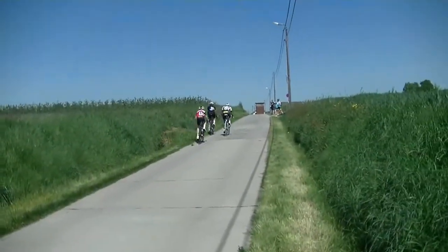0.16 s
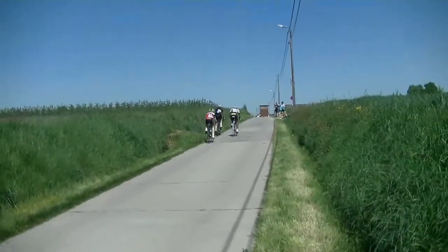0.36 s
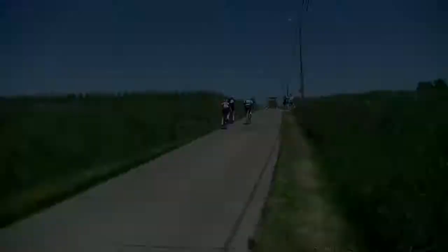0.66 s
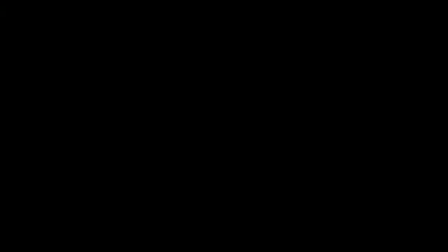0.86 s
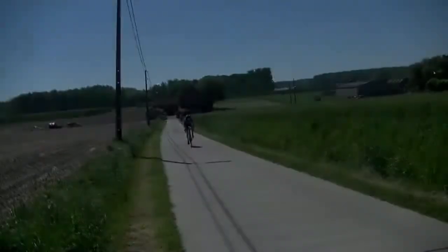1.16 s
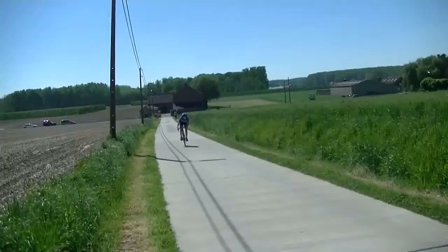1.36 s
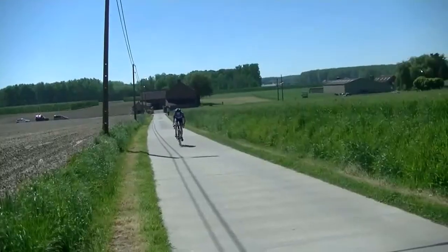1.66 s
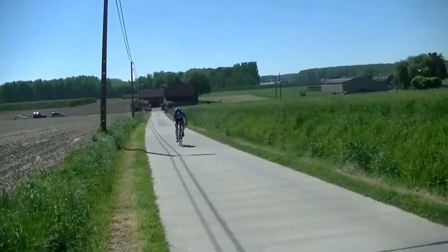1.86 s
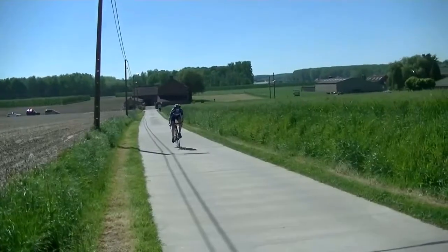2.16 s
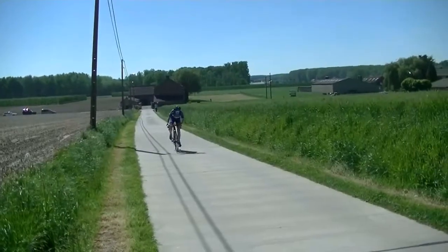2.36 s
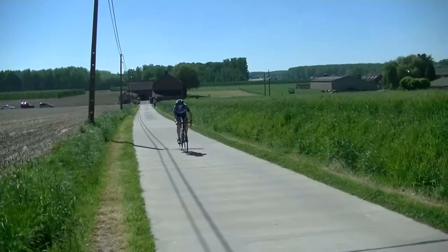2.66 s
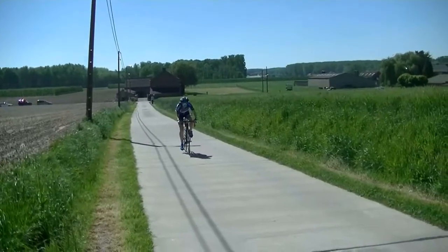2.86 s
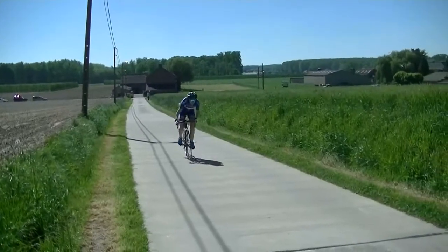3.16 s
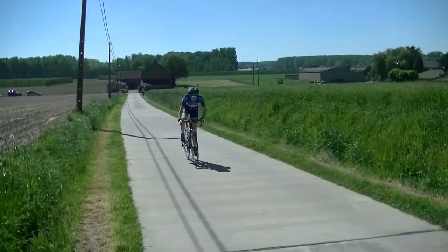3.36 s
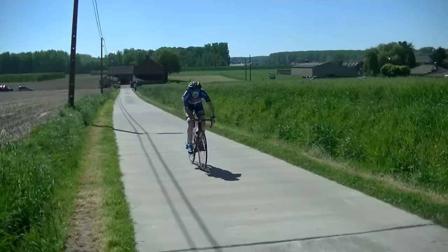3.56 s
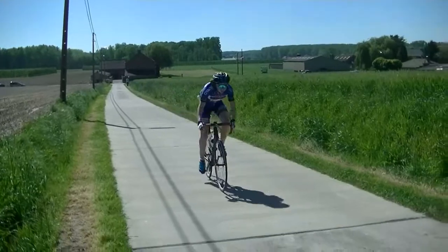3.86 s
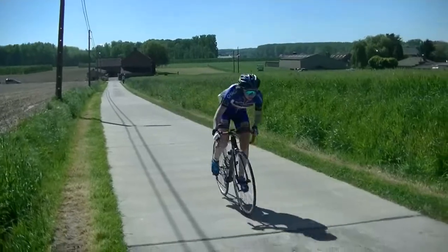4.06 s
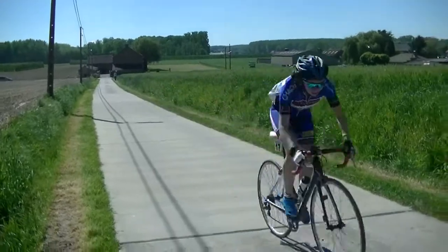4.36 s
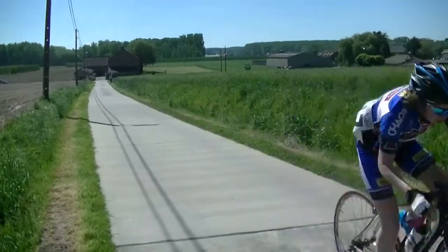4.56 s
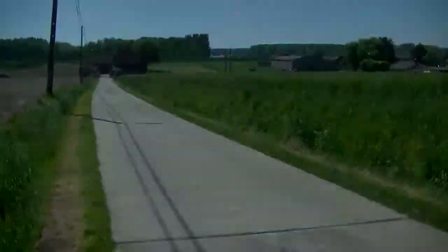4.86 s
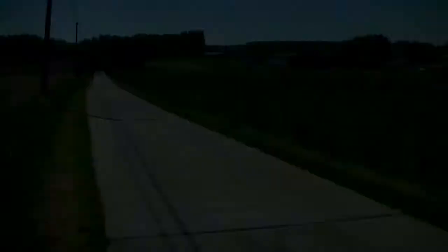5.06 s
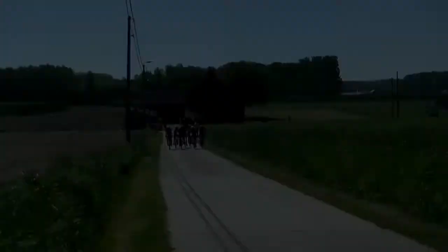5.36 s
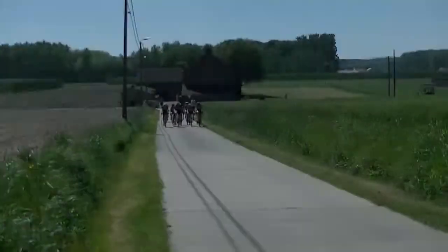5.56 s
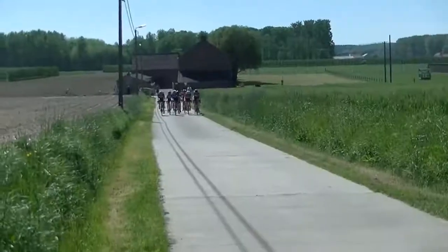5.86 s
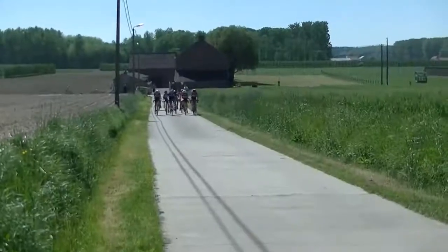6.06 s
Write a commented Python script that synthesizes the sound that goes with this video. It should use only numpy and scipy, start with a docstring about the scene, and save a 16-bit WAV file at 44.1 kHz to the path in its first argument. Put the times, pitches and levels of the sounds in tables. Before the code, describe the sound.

A small handheld stereo microphone stands beside a concrete lane in open fields, with steady faint hiss throughout. From 0 to 0.9 s soft rustling air and low hum sit beneath close handling: dry plastic clicks near 0.2 and 0.5, then the loudest snaps with dull thumps at 0.67 and 0.86, each led by a brief finger rub. A hard cut at 0.93 opens calmer air, with small clicks at 1.3 and 2.7 and a very faint falling whistle at 1.8. A lone bicycle slowly emerges, with pulsing tyre hiss, fine bright chain ticking and faint scuffs. It swells steeply from about 4 s, with sharp ticks from 4.3, and is nearest around 4.95. A heavy short thud at 5.05 and a crisp click at 5.14 follow. At 5.24 it cuts off abruptly, leaving quiet rustle and weak taps until 6.2 s.

```python
"""Case handling and a passing bicycle

Fingers click, rub and thump a plastic case; clicks from 4.3 to 5.2 s are probably ticks of the passing bicycle.
Short rough bursts and pushes ring banks of modes. In the second of three hard-cut shots the bicycle nears
on concrete: noise for tyres and road, ringing chain ticks.
Behind them are field air (patchy noise humming and rustling), one falling sine whistle and microphone hiss.
"""
import sys
import numpy as np
from scipy import signal
from scipy.fft import rfft, irfft, next_fast_len
from scipy.io import wavfile

SR = 44100
rng = np.random.default_rng(int(sys.argv[2]) if len(sys.argv) > 2 else 0)


def digitize_waveform(pressure):
    """Quantize a signal to 16-bit integers and store it at the path in sys.argv[1].

    Rows of a 2-D input are taken as channels; values are limited to [-1, 1].
    """
    field = np.atleast_2d(pressure).T
    bounded = np.clip(field, -1, 1)
    quanta = np.round(bounded * 32767).astype(np.int16)
    wavfile.write(sys.argv[1], SR, quanta)


N = 273413

# Shots: start_s, end_s
SHOTS = [(0, .922), (.928, 5.243), (5.244, 6.2)]

# Sharp clicks: fingers on the plastic case, and from 4.3 to 5.2 s probably ticks of the passing bicycle:
# start_s, peak_db (before pan), centre_hz, contact_s
CLICKS = [(0.176, -29.5, 2690, .002), (0.2029, -19, 2540, 0.0013), (0.2488, -27.5, 2280, 0.0024),
          (0.4853, -12.5, 2600, 0.0011), (0.5374, -12.5, 2560, .0012), (0.607, -34, 2920, 0.0013),
          (0.64, -34, 2230, .0025), (0.653, -33, 2250, 0.0032), (0.662, -21, 4520, 0.0054),
          (0.667, -3, 3960, .002), (0.6812, -24.5, 5440, 0.0022), (0.769, -38.5, 5590, .002),
          (0.8007, -40, 2350, .002), (0.809, -26.5, 2450, .002), (0.815, -37, 2410, 0.0018),
          (0.8205, -42, 2370, .002), (0.836, -23, 2380, .0015), (0.845, -27, 2900, 0.0022),
          (0.855, -1, 3240, 0.0019), (0.8588, -11, 2570, 0.0029), (1.3262, -28.5, 3730, 0.0011),
          (2.6688, -16, 2870, .0008), (3.73, -32, 3500, .003), (4.307, -31, 6000, 0.0022),
          (4.422, -31, 5000, .003), (4.462, -25.5, 4300, .002), (4.733, -20.5, 3500, 0.0022),
          (5.046, -15.5, 2420, 0.0028), (5.1405, -11, 3400, .0008), (5.185, -22.5, 4470, 0.0022),
          (5.328, -36, 2480, 0.0028), (5.3435, -44, 4600, .002), (5.468, -42, 5150, .002),
          (5.5713, -41, 2480, .001), (5.785, -43, 2360, .002), (5.812, -41.5, 2810, .003),
          (5.833, -36, 2080, 0.0029), (5.902, -41.5, 2140, .004), (5.9776, -32.5, 4070, .001)]
# Click and rub modes: mode_hz, relative_db, t60_s
SHELL_MODES = [(880, 26.5, 0.045), (1580, -38, 0.0034), (2050, -42, 0.0048), (2488, 6, 0.022),
               (2885, 16, 0.0053), (3560, 7.5, 0.0052), (3550, -15, 0.066), (4140, 17.5, 0.0038),
               (4720, 16, 0.0066), (5190, 19, 0.0059), (5900, -31, 0.04), (6050, 18, 0.0062),
               (7830, -23, 0.0049), (9000, -41, .003), (10060, -21, 0.0016), (13500, -12, .003)]
# Finger drags ending in a slip: end_s, length_s, final_db (before pan)
RUBS = [(0.675, 0.06, -35.5), (0.846, 0.051, -30), (5.836, 0.041, -48)]
# Case thumps: start_s, peak_db (before pan), push_s
THUMPS = [(0.177, -26, 0.0036), (0.202, -28, 0.0033), (0.216, -42, 0.0037), (0.252, -42, 0.0027),
          (0.267, -42, 0.0043), (0.294, -43, 0.0036), (0.453, -41.5, 0.0029), (0.485, -37.5, 0.0038),
          (0.536, -27.5, 0.0034), (0.613, -37.5, 0.0037), (0.621, -35.5, 0.0058), (0.665, -24.5, 0.0022),
          (0.668, -11.5, 0.0039), (0.727, -45, 0.0039), (0.802, -43, 0.0024), (0.81, -33, 0.0034),
          (0.823, -32, 0.0024), (0.831, -29, 0.0041), (0.844, -26, 0.0043), (0.855, -10, 0.0042),
          (1.326, -44.5, 0.0033), (2.667, -46.5, 0.003), (4.906, -41, 0.0047), (4.918, -37.5, 0.0058),
          (4.949, -35.5, 0.0029), (5.142, -38, 0.0029), (5.295, -40, 0.0061), (5.328, -38, 0.0034),
          (5.509, -39.5, 0.0035), (5.772, -44, 0.0054), (5.833, -33, 0.004), (5.904, -44.5, 0.0026),
          (5.937, -44.5, 0.0078), (5.958, -50, 0.0049), (6.064, -45, 0.0037), (6.075, -45, 0.0046),
          (6.086, -48, 0.004), (6.149, -50.5, 0.0032)]
# Body modes: mode_hz, relative_db, t60_s
BODY_MODES = [(157, -12, 0.049), (247, 11, 0.022), (423, 16, 0.0052), (660, 2, 0.008), (930, -4, 0.01)]
# Wheel over a slab joint jolts the case: start_s, peak_db (before pan), push_s, side_db_per_octave
JOINT = (5.047, -7.5, .0045, -8)
# Shifting grip, one value a shot: small_thumps_per_s
GRIP_PER_S = [64, 1.5, 14]
CONTACT_RISE_LENGTHS = 0.83
CLICK_FALL_DB_PER_OCTAVE, FALL_PER_DB_WEAKER = 9, 0.3   # fall away from the centre, for a 0 dB click
RUB_SWELL_DB, SNAP_DB, THUMP_SIDE_DB_PER_OCTAVE, GRIP_DB = 25, 17, 8, -58.5
NEAR_PAN_DB = 1.3   # left over right: the hand holds the left side

# Tyre roar spectrum: freq_hz, relative_db_per_hz
TYRE_SPECTRUM = [(260, -35), (450, -15.5), (748, -16), (818, -6.5), (1070, -14), (1490, -8), (2700, -3),
                 (3140, -6.5), (4110, 1), (6730, -8.5), (7930, -23), (9200, -22), (10400, -42),
                 (11500, -29), (16000, -46)]
# Road rumble spectrum: freq_hz, relative_db_per_hz
ROAD_SPECTRUM = [(18, -53), (30, -5), (119, -19), (264, 2.5), (414, -5.5), (572, -32), (650, -12),
                 (840, -22), (1430, -120)]
# Rider left-right likeness: freq_hz, likeness_0_to_1
RIDER_LIKENESS = [(60, 0.62), (240, 0.92), (950, 1), (3770, 0.9), (15000, 0.94)]
# Distance laws over soft ground: nearest_db (before pushes and pan), loss_db_per_doubling
TYRE_LAW = (-36.5, 10.95)
RUMBLE_LAW = (-56, 6.4)
CHAIN_LAW = (-43.5, 15.2)
# Chain modes: mode_hz, relative_db, t60_s
CHAIN_MODES = [(6550, 2, .007), (7050, -5, .006), (9000, -4, .006), (9600, -2, .006), (10300, -2, .006),
               (11000, -7, .005), (12900, -12, .002)]
# Chain scuffs on the guide, about one a crank turn: centre_s, level_db (before pan), tilt_db_per_octave
SCUFFS = [(2.28, -66.5, 4), (3.1, -61.5, 0), (3.92, -66, -5)]
# Guide resonances: mode_hz, relative_db, t60_s
GUIDE_MODES = [(1570, 0, .01), (2550, -1, .006), (3950, 1, .005)]
SPEED_M_PER_S, PASS_S, NEAREST_M = 9, 4.955, 3.45
DULLING_DB_PER_OCTAVE_M, NEAR_TILT_DB_PER_OCTAVE = 0.0914, 0.13
CRANK_HZ, CRANK_S, CRANK_DB = 1.172, 5.05, 2.5   # turns per s, moment of a push (two a turn), swing
STRONG_LEG_S, STRONG_LEG_DB = 4.323, 1.5   # one leg pushes harder: moment, swing
LINKS_PER_S, SCUFF_WIDTH_S = 56, 0.13
RIDER_PAN_DB = -0.4   # left over right

# Field air, one table a shot: time_s, hum_db, rustle_db
FIELD_LEVELS = [
    [(0.0, -65.5, -54), (0.7, -61.5, -54), (0.92, -65, -55)],
    [(0.93, -59.5, -63.5), (1.86, -66.5, -61.5), (2.7, -62.5, -61.5), (3.2, -66.5, -60)],
    [(5.25, -69, -60.5), (5.894, -63.5, -60.5), (6.2, -65, -60.5)],
]
# Hum spectrum: freq_hz, relative_db_per_hz
HUM_SPECTRUM = [(15, -61), (25, -23.5), (193, -13), (268, -5.5), (324, -11.5), (367, -10), (403, -15),
                (650, -25.5), (840, -81), (1430, -120)]
# Rustle spectrum, middle shot: freq_hz, relative_db_per_hz
RUSTLE_SPECTRUM = [(320, -75), (550, -7), (658, -38), (704, -6), (787, 6.5), (1020, -13.5), (1590, -3),
                   (1720, -4), (2260, 5), (2700, -3), (2920, -0.5), (4130, -1.5), (5410, 3.5), (6110, -15),
                   (8000, -8.5), (10400, -15.5), (17600, -120)]
# Rustle spectrum, first and last shot: freq_hz, relative_db_per_hz
LANE_RUSTLE_SPECTRUM = [(320, -54.5), (550, -19), (744, -9), (1090, -14), (1180, -15), (1690, -9),
                        (2060, -5.5), (2410, -7.5), (2610, -6.5), (2990, -8), (4940, -7.5), (6250, -16.5),
                        (8000, -21.5), (10400, -25.5), (17600, -120)]
# Field left-right likeness: freq_hz, likeness_0_to_1
FIELD_LIKENESS = [(60, 0.61), (240, 0.55), (950, 0.86), (3770, 0.63), (15000, 0.074)]
# Far falling whistle: time_s, pitch_hz, peak_db
BIRD = [(1.77, 5750, -65), (1.79, 5570, -66), (1.85, 5460, -64), (1.88, 5470, -73)]
# Microphone hiss spectrum: freq_hz, relative_db_per_hz
HISS_SPECTRUM = [(600, -9.5), (1200, -10), (5000, 0), (7000, -1), (11000, -4.5), (16000, -10), (17000, -30)]
# Hiss left-right likeness: freq_hz, likeness_0_to_1
HISS_LIKENESS = [(6000, 0.089), (15000, 0.077)]
HISS_DB = -62.5
BASS_CUT_HZ, CUTOFF_HZ = 105, 16700


def from_db(db):
    """Amplitude gain of a level in dB."""
    return 10 ** (np.asarray(db) / 20)


def rms_one(x):
    """Scale to rms 1."""
    return x / np.sqrt(np.mean(x ** 2) + 1e-20)


def in_time(rows):
    """Interpolate the value columns of a time table at every sample."""
    time_s, *columns = np.transpose(rows)
    return [np.interp(np.arange(N) / SR, time_s, column) for column in columns]


def shot(k):
    """True while shot k runs."""
    t = np.arange(N) / SR
    return (t >= SHOTS[k][0]) & (t <= SHOTS[k][1])


def at_hz(points, hz):
    """Interpolate a spectrum on a log frequency axis."""
    points_hz, values = np.array(points).T
    return np.interp(np.log(hz), np.log(points_hz), values)


def drift(rate_hz):
    """Slow random curve of rms 1: two-pole lowpassed noise, computed every 40 samples."""
    r = np.exp(-80 * np.pi * rate_hz / SR)
    slow = signal.lfilter([1], [1, -2 * r, r * r], rng.standard_normal(N // 40 + 2002))[2000:]
    return np.interp(np.arange(N) / 40, np.arange(len(slow)), rms_one(slow))


def ring(x, mode_hz, t60_s):
    """Two-pole resonance; a unit click starts a decaying sine of height 1."""
    r, w = from_db(-60 / (t60_s * SR)), 2 * np.pi * mode_hz / SR
    return signal.lfilter([0, np.sin(w)], [1, -2 * r * np.cos(w), r * r], x + 1e-18)


def pan(x, left_over_right_db):
    """Split a level difference between left and right."""
    half_db = left_over_right_db / 2
    return x * from_db(np.array([[half_db], [-half_db]]))


def noise(spectrum, likeness, patchy_db, rate_hz, tilt_db=0):
    """Shaped stereo noise, rms 1 before its 2/3-octave bands flicker and tilt about 4 kHz."""
    size = next_fast_len(N)
    hz = np.arange(size // 2 + 1) * SR / size + 1e-3
    mid, side = rfft(rng.standard_normal((2, size)))
    alike = np.clip(at_hz(likeness, hz), 0, 1)
    both = np.sqrt(1 + alike) * mid + np.sqrt(1 - alike) * side * [[1], [-1]]
    both = from_db(at_hz(spectrum, hz)) * both
    both /= np.sqrt(np.sum(abs(both) ** 2)) / size

    centres = np.arange(np.log2(spectrum[1][0]), np.log2(spectrum[-2][0]), 2 / 3)
    place = np.clip(np.log2(hz), centres[0], centres[-1])
    together = drift(rate_hz / 3)
    out = 0
    for centre in centres:
        weight = np.clip(1 - abs(place - centre) * 3 / 2, 0, 1)
        band = irfft(both * weight, size)[:, :N]
        flicker_db = patchy_db * (together / 2 + drift(rate_hz))
        out = out + band * from_db(flicker_db + tilt_db * (centre - np.log2(4000)))
    return out


def add(out, start_s, sound):
    """Mix a short sound into out."""
    i = round(start_s * SR)
    out[:, i:i + sound.shape[1]] += sound[:, :N - i]


def shell(contact, centre_hz, fall_db_per_octave, luck_db):
    """Contact force rings the shell modes, most strongly those near its centre."""
    out = 0
    for (mode_hz, db, t60_s), chance_db in zip(SHELL_MODES, luck_db):
        fall_db = max(fall_db_per_octave, 0) * abs(np.log2(mode_hz / centre_hz))
        out = out + from_db(db + chance_db - fall_db) * ring(contact, mode_hz, t60_s)
    lowpass = signal.butter(2, min(3.9 * centre_hz, 18000), fs=SR, output="sos")
    highpass = signal.butter(3, 1600, "high", fs=SR, output="sos")
    return signal.sosfilt(np.vstack([lowpass, highpass]), out)


def clicks():
    """Sharp clicks: a few ms of rough noise ring the modes; each microphone has some grit of its own."""
    out, t = np.zeros((2, N)), np.arange(4000) / SR
    luck_db = rng.standard_normal((len(CLICKS), len(SHELL_MODES)))
    grit = rng.standard_normal((len(CLICKS), 2, len(t)))
    for (start_s, db, centre_hz, contact_s), luck, (mid, side) in zip(CLICKS, luck_db, grit):
        rough = mid + 0.38 * side * [[1], [-1]]
        force = rough * np.exp(-(t / max(contact_s, 2e-4) - CONTACT_RISE_LENGTHS) ** 2)
        fall = CLICK_FALL_DB_PER_OCTAVE - FALL_PER_DB_WEAKER * db
        sound = shell(force, centre_hz, fall, luck)
        add(out, start_s, from_db(db) * sound / abs(sound).max())
    return out


def rub():
    """Skin slips in dense uneven grains through the shell, swelling until the finger lets go."""
    t, level = np.arange(N) / SR, 0
    for end_s, length_s, db in RUBS:
        swell_db = RUB_SWELL_DB * np.minimum(t - end_s, 0) / length_s
        level = level + from_db(db + swell_db) * (t > end_s - length_s) * (t < end_s)
    grains = (rng.random(N) < 1500 / SR) * from_db(3.0 * rng.standard_normal(N))
    grains = grains * rng.choice([-1, 1], N)
    creak = shell(grains, centre_hz=2450, fall_db_per_octave=22.0, luck_db=np.zeros(len(SHELL_MODES)))
    return level * rms_one(creak)


def thud(push_s, side_db_per_octave):
    """Press, snap and release ring the body modes, weighted away from the second mode; peak 1."""
    phase = np.clip(np.arange(3000) / SR / max(push_s, 1e-3), 0, 1)
    push = np.sin(2 * np.pi * phase) * np.sin(np.pi * phase)
    push[np.argmax(phase >= .5)] -= from_db(SNAP_DB)   # the press gives way at its middle
    sound = 0
    for mode_hz, db, t60_s in BODY_MODES:
        side_db = side_db_per_octave * abs(np.log2(mode_hz / BODY_MODES[1][0]))
        sound = sound + from_db(db + side_db) * ring(push, mode_hz, t60_s)
    return sound / abs(sound).max()


def thumps():
    """Body thuds at listed times, the joint jolt, and a random patter from the shifting grip."""
    out = np.zeros((1, N))
    for start_s, db, push_s in THUMPS:
        add(out, start_s, from_db(db) * thud(push_s, THUMP_SIDE_DB_PER_OCTAVE)[None])
    joint_s, joint_db, *joint_thud = JOINT
    add(out, joint_s, from_db(joint_db) * thud(*joint_thud)[None])
    per_s = sum(rate * shot(k) for k, rate in enumerate(GRIP_PER_S))
    patter_db = GRIP_DB + 7.7 * np.minimum(rng.standard_normal(N), 1.5)
    patter = (rng.random(N) < per_s / SR) * from_db(patter_db) * rng.choice([-1, 1], N)
    return out + signal.fftconvolve(patter, thud(0.0056, side_db_per_octave=1))[:N]


def chain():
    """Links seat on teeth: near-regular ticks, every second one weaker, ring the modes unevenly."""
    turns = np.cumsum(2 * LINKS_PER_S * (1 + 0.024 * drift(4.8))) / SR
    at = np.flatnonzero(np.diff(np.floor(turns)))
    chance = rng.standard_normal((len(at), len(CHAIN_MODES) + 1))
    at = np.clip(at + (40 * chance[:, -1]).astype(int), 0, N - 1)
    weaker_db = 6 * (np.arange(len(at)) % 2)
    out = 0
    for k, (mode_hz, db, t60_s) in enumerate(CHAIN_MODES):
        ticks = np.zeros(N)
        ticks[at] = from_db(db + 4 * chance[:, k] - weaker_db)
        bursts = signal.lfilter([1], [1, -.975], ticks)   # decay in about 1 ms
        whirr = .17 * from_db(db)
        rough = (bursts + whirr) * rng.standard_normal(N)
        out = out + (-1) ** k * ring(rough, mode_hz, t60_s)
    return rms_one(np.array([out, np.roll(out, shift=1)]))   # right lags one sample


def scuff():
    """Chain on its guide: soft hiss through the guide's resonances, swelling and fading."""
    t, hiss, out = np.arange(N) / SR, rng.standard_normal(N), 0
    for mode_hz, mode_db, t60_s in GUIDE_MODES:
        octaves = np.log2(mode_hz / GUIDE_MODES[1][0])
        level = 0
        for centre_s, db, tilt_db in SCUFFS:
            swell = np.exp(-((t - centre_s) / SCUFF_WIDTH_S) ** 2)
            level = level + from_db(db + mode_db + tilt_db * octaves) * swell
        out = out + level * rms_one(ring(ring(hiss, mode_hz, t60_s), mode_hz, t60_s))
    return out


def rider():
    """Tyre, road and chain follow distance until the cut; pedal pushes sway tyre and chain."""
    t = np.arange(N) / SR
    metres = np.hypot(NEAREST_M, SPEED_M_PER_S * (t - PASS_S))
    push_db = CRANK_DB * np.cos(4 * np.pi * CRANK_HZ * (t - CRANK_S))
    push_db += STRONG_LEG_DB * np.cos(2 * np.pi * CRANK_HZ * (t - STRONG_LEG_S))
    doublings = np.log2(metres / NEAREST_M)
    tyre_db, rumble_db, chain_db = (near_db - loss_db * doublings
                                    for near_db, loss_db in (TYRE_LAW, RUMBLE_LAW, CHAIN_LAW))
    tilt_db = NEAR_TILT_DB_PER_OCTAVE - DULLING_DB_PER_OCTAVE_M * (metres - NEAREST_M)
    roar = noise(TYRE_SPECTRUM, RIDER_LIKENESS, patchy_db=2.0, rate_hz=23.6, tilt_db=tilt_db)
    tyre = from_db(tyre_db + push_db) * roar
    rumble = from_db(rumble_db) * noise(ROAD_SPECTRUM, RIDER_LIKENESS, patchy_db=5.0, rate_hz=11.0)
    ticking = from_db(chain_db + push_db) * chain()
    return pan(tyre + rumble + ticking + scuff(), RIDER_PAN_DB) * shot(1)


def field():
    """Field air hums through the case and rustles: patchy noise with levels set shot by shot."""
    hum_level, rustle_level = (sum(from_db(in_time(FIELD_LEVELS[k])[column]) * shot(k) for k in range(3))
                               for column in range(2))
    hum = noise(HUM_SPECTRUM, FIELD_LIKENESS, patchy_db=0.5, rate_hz=19)
    middle = noise(RUSTLE_SPECTRUM, FIELD_LIKENESS, patchy_db=0.2, rate_hz=25.0)
    lane = noise(LANE_RUSTLE_SPECTRUM, FIELD_LIKENESS, patchy_db=2.0, rate_hz=17)
    return hum_level * hum + rustle_level * np.where(shot(1), middle, lane)


def bird():
    """One faint falling whistle: a sine of gliding pitch."""
    pitch_hz, db = in_time(BIRD)
    t = np.arange(N) / SR
    sounding = (t > BIRD[0][0]) & (t < BIRD[-1][0])
    return from_db(db) * np.sin(2 * np.pi * np.cumsum(pitch_hz) / SR) * sounding


def microphone_hiss():
    """Steady self-noise, nearly independent in the two microphones."""
    return from_db(HISS_DB) * noise(HISS_SPECTRUM, HISS_LIKENESS, patchy_db=0, rate_hz=9)


def scene():
    """Mix all sources; only the microphone hiss bridges the cuts."""
    near = pan(clicks() + rub() + thumps(), NEAR_PAN_DB)
    running = shot(0) | shot(1) | shot(2)
    return (near + rider() + field() + bird()) * running + microphone_hiss()


def record(dry):
    """The small microphones lose the deep bass; a steep lowpass cuts the top."""
    thin = signal.sosfilt(signal.butter(2, BASS_CUT_HZ, "high", fs=SR, output="sos"), dry)
    return signal.sosfilt(signal.cheby2(14, 70, CUTOFF_HZ, fs=SR, output="sos"), thin)


dry = scene()
out = record(dry)
digitize_waveform(out)
```